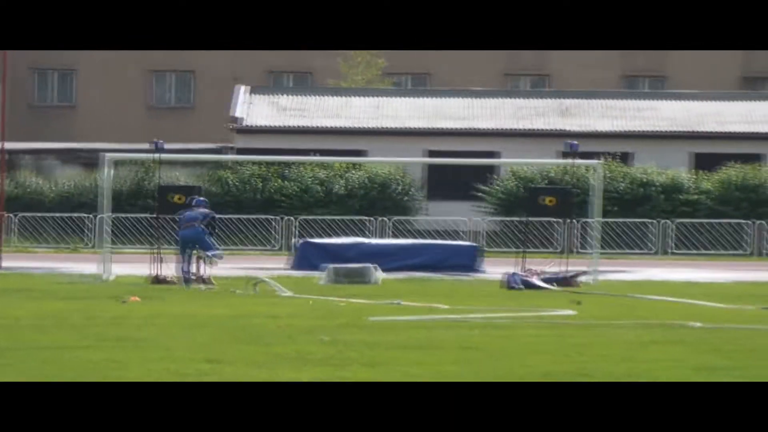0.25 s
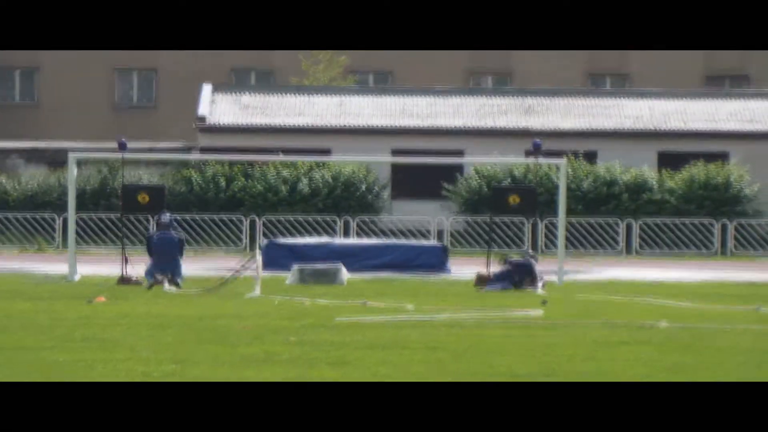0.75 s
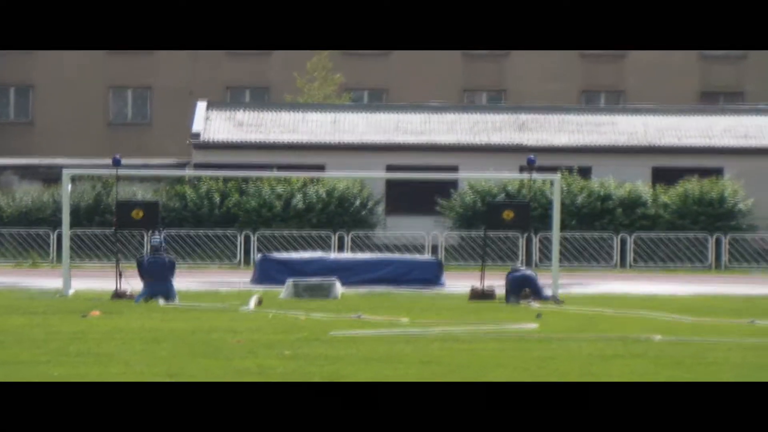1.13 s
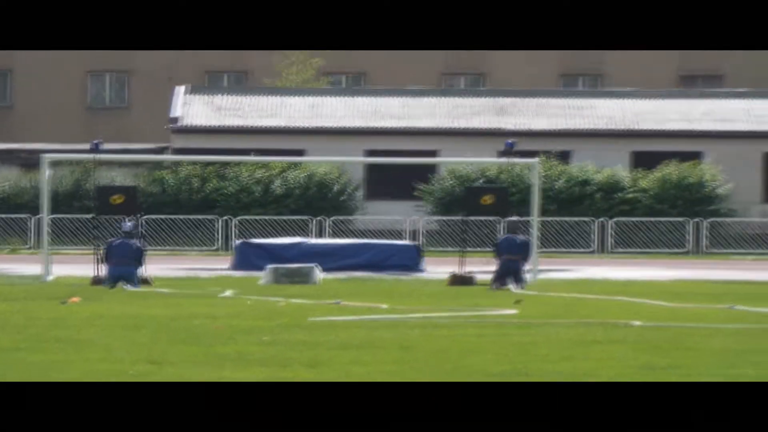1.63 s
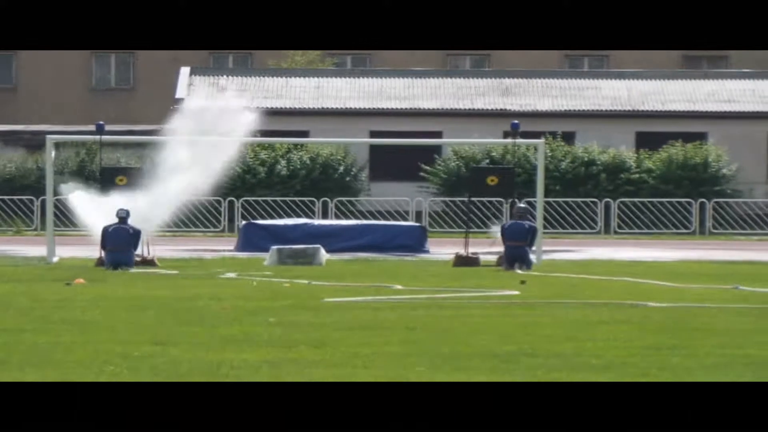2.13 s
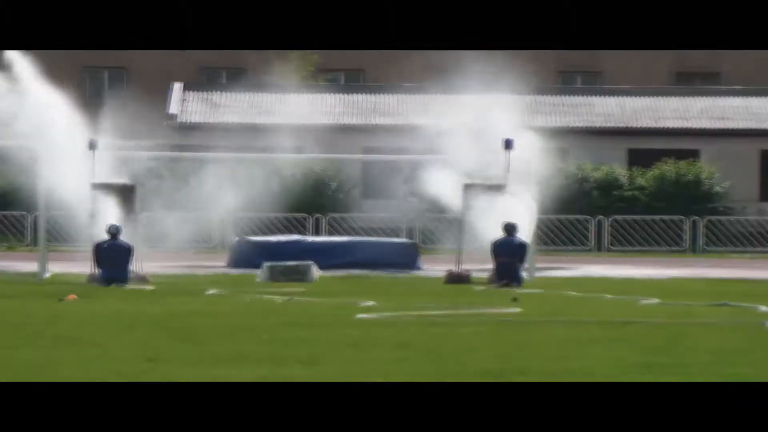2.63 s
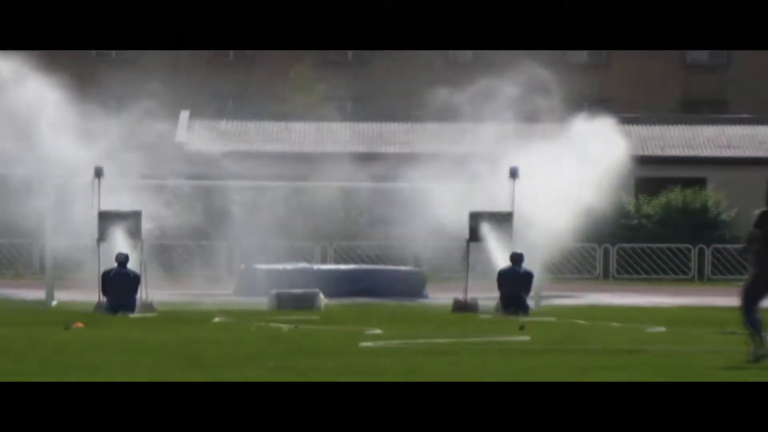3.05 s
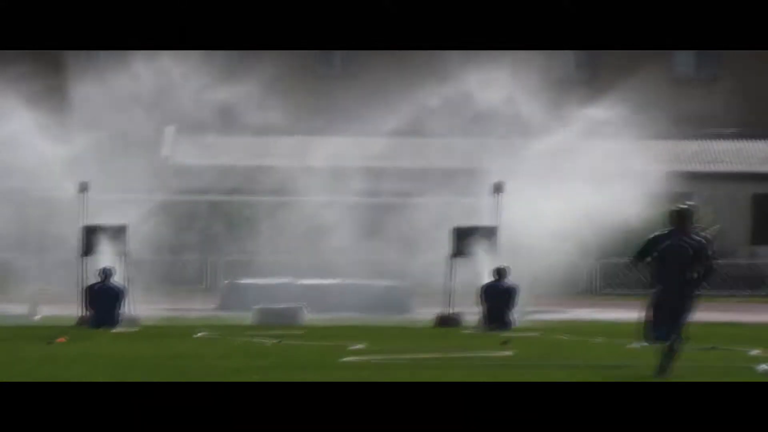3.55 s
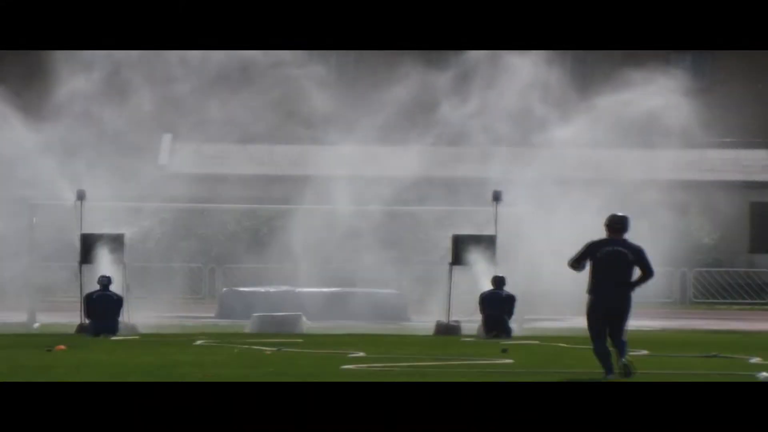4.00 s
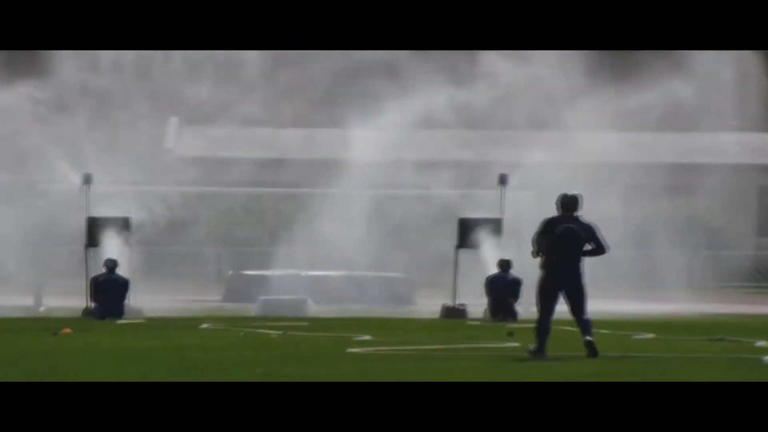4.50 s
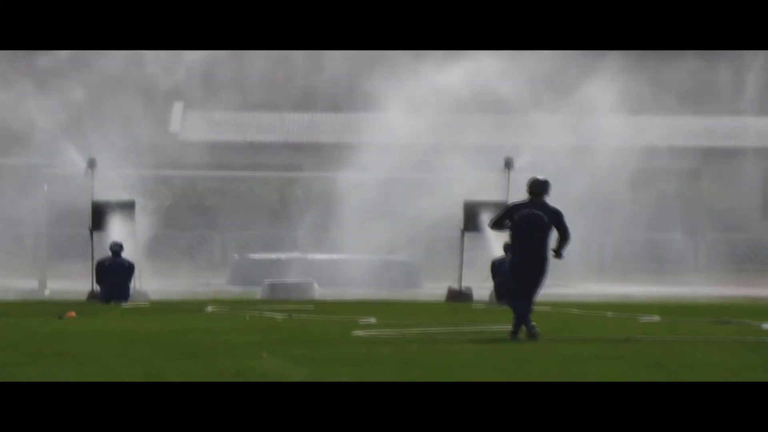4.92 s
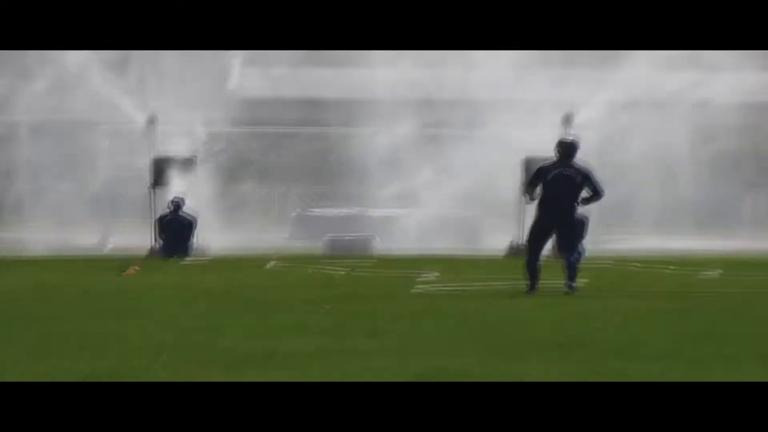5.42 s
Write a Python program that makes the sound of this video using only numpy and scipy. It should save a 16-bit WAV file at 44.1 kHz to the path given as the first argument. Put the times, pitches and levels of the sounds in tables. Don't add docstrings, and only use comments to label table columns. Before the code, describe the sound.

Close, raspy engine buzz holds steady, climbs in pitch after about two and a half seconds, then roars steadily over rushing water.

```python
import sys
import numpy as np
from scipy import signal
from scipy.fft import rfft, irfft, next_fast_len
from scipy.io import wavfile
from scipy.ndimage import uniform_filter1d, map_coordinates

SR = 44100
rng = np.random.default_rng(int(sys.argv[2]) if len(sys.argv) > 2 else 0)


def transcribe(u):
    v = np.clip(np.atleast_2d(u).T, -1, 1)
    q = np.round(v * 32767).astype(np.int16)
    wavfile.write(sys.argv[1], SR, q)


def elevation(decibels):
    levels = np.asarray(decibels, float)
    return 10 ** (levels / 20)


N = 249606
ECHO_S = .0016


def unit(x):
    return x / np.sqrt(np.mean(x ** 2) + 1e-20)


def along(points, hz):
    f, v = np.transpose(points)
    return np.interp(np.log(np.abs(hz) + 1), np.log(f + 1), v)


def curve(rows):
    s, value = np.transpose(rows)
    return np.interp(np.arange(N) / SR, s, value)


def wobble(rate):
    knots = rng.standard_normal(int(N * rate / SR) + 4)
    return map_coordinates(knots, [np.arange(N) * rate / SR])


def filtered(x, response):
    m = 2 * next_fast_len(N // 2 + SR // 4)
    return irfft(rfft(x, m) * response(np.fft.rfftfreq(m, 1 / SR)), m)[..., :N]


def resonance(f, centre, width, db):
    return elevation(db) * 1j * f * width / (centre ** 2 - f ** 2 + 1j * f * width)


def pulses(at, sizes):
    index = np.floor(at).astype(int)[:, None] + np.arange(-7, 9)
    off = index - at[:, None]
    taps = sizes[:, None] * np.sinc(off) * np.cos(np.pi * off / 16) ** 2
    return np.bincount(np.clip(index, 0, N - 1).ravel(), taps.ravel(), N)


def patchy(spectrum, patchy_db, channels):
    z = signal.stft(rng.standard_normal((channels, N)), nperseg=512)[2]
    field = uniform_filter1d(rng.standard_normal(z.shape[1:]), size=6, axis=0)
    field = uniform_filter1d(field, size=12, axis=1)
    noise = signal.istft(z * elevation(patchy_db * unit(field)), nperseg=512)[1][:, :N]
    return unit(filtered(noise, lambda hz: elevation(along(spectrum, hz))))


def hold(t, start, length, fade_s):
    return (np.tanh((t - start) / fade_s) - np.tanh((t - start - length) / fade_s)) / 2


# (time [s], level over the held load [dB])
LOAD = [(0, .5), (1.4, 0), (2.45, 1), (2.65, 1), (2.8, 1.5), (3.1, 4), (3.3, 4.5), (3.5, 7), (3.8, 5.5),
        (4.3, 5), (5, 6.5), (5.66, 6.5)]


def layer_db(held_db, db_per_db):
    return held_db + db_per_db * curve(LOAD)


# (time [s], firing rate [Hz])
SPEED = [(0.12, 125.87), (0.45, 125.61), (0.75, 125.25), (1.4, 125.43), (1.9, 126.24), (2.4, 126.79),
         (2.65, 128.32), (2.95, 132.67), (3.2, 137.79), (3.5, 144.54), (3.75, 148.8), (3.95, 150.89),
         (4.15, 151.83), (4.42, 152.33), (4.62, 152.72), (5.0, 153.34), (5.55, 153.84)]
# (size [dB], bark share at low speed [1], bark share at high speed [1])
CYLINDERS = [(6, 0.07, 0.13), (7.15, 1.0, 0.3), (2, 0.09, 0.13), (6, .78, 0.28)]


def engine():
    hz = curve(SPEED)
    turns = np.cumsum(hz * (1 + 0.00056 * wobble(25.09))) / SR
    fast = np.clip((hz - 128) / 22, 0, 1)
    number = np.arange(1, int(turns[-1]))
    at = np.interp(number, turns, np.arange(N))
    late_at = at + 1.1e-5 * SR * rng.standard_normal(len(number))
    share = np.interp(at, np.arange(N), fast)
    size_db, bark_slow, bark_fast = np.array(CYLINDERS)[number % 4].T
    edge_db = layer_db(-20.5, 1.19)

    edge = pulse_edges(late_at, number, share, fast, edge_db)
    bark = manifold_bark(late_at, (1 - share) * bark_slow + share * bark_fast, fast, edge_db)
    sharp = filtered(np.array([edge, bark]), lambda f: scatter(f, spread_s=.006, from_hz=2700))
    exhaust = band_swells(filtered(hum(hz, turns) + sharp[0], nulls) + sharp[1]
                      + uneven_firings(at, size_db, hz, fast)
                      + cover(gas_noise(turns) + clatter(turns), fast))
    return exhaust + glints(gas_puff(turns)), gas_puff(turns)


def echo(hz):
    return 1 - .85 * np.exp(-2j * np.pi * hz * ECHO_S)


# (frequency [Hz], level [dB])
HUM = [(125, -28), (155, -27.5), (250, -18.5), (260, -17.5), (305, -18.5), (380, -24), (560, -24),
       (600, -39.5)]


def order_db(k, hz):
    return layer_db(0.051, 0.97) + along(HUM, k * hz)


def hum(hz, turns):
    total = np.zeros(N)
    for k in range(1, 5):
        level = np.sqrt(2) * elevation(order_db(k, hz) + 0.025 * wobble(32))
        total += level * np.cos(2 * np.pi * k * turns + np.angle(echo(k * hz)))
    return total


def causal(pipe, f):
    return elevation(along(pipe, f)) * np.exp(1j * np.angle(echo(f) / (1 + 1j * f / 2500)))


# (frequency [Hz], level [dB])
PIPE_SLOW = [(350, -11), (600, 2), (764, 2), (815, -0.5), (1020, 2), (1210, -8), (1460, -14), (1750, -16),
             (1900, -7), (2040, -22), (2520, -11), (2900, -26), (3250, -17), (3600, -27), (5500, -36),
             (7150, -40), (12100, -120)]
PIPE_FAST = [(410, -41), (700, 5.5), (838, 10), (959, 7), (1240, 2.5), (1390, -1.5), (1700, 1.5),
             (2040, -8.5), (2600, -2), (3100, -4), (3560, -6), (4450, -19.5), (4950, -4), (5250, -20),
             (5900, -18), (9000, -120)]


def pulse_edges(at, number, share, fast, edge_db):
    swing_db = np.interp(share, [0, 1], (.4, 1.7)) * (2 * (number % 2) - 1)
    edges = pulses(at, elevation(swing_db + .4 * rng.standard_normal(len(at))))
    slow_edge = unit(filtered(edges, lambda f: causal(PIPE_SLOW, f)))
    fast_edge = unit(filtered(edges, lambda f: causal(PIPE_FAST, f)))
    return elevation(edge_db - 2.0) * ((1 - fast) * slow_edge + fast * fast_edge)


# (frequency [Hz], width [Hz], level [dB])
BARK = [(1060, 22, -1.5), (1307, 37, 0), (1457, 170, -0.5), (1746, 76, -7), (1945, 75, -23),
        (2260, 92, -13), (2780, 100, -10), (2800, 55, -11.5)]


def manifold_bark(at, branch_share, fast, edge_db):
    knocks = pulses(at, branch_share * elevation(.6 * rng.standard_normal(len(at))))

    def response(f):
        ring = sum(resonance(f, *mode) for mode in BARK) / (1 + 1j * f / 4000) ** 2
        returned = 1 - .4 * np.exp(-2j * np.pi * f * ECHO_S)
        return ring * returned * (1j * f / (800 + 1j * f))

    return elevation(edge_db - 6.5 - 9.6 * fast) * unit(filtered(knocks, response))


# (frequency [Hz], level [dB])
UNEVEN = [(20, -60), (80, -38), (105, -18), (200, -4), (240, -6), (310, 3), (400, -1), (480, -7), (570, 0),
          (650, -6), (900, -24), (1500, -120)]


def uneven_firings(at, size_db, hz, fast):
    sizes = elevation(size_db + 0.21 * rng.standard_normal(len(at)))
    excess = pulses(at, sizes - np.mean(elevation(size_db)))
    return elevation(order_db(2, hz) - 20.0 - fast) * unit(filtered(excess, lambda f: elevation(along(UNEVEN, f))))


def gas_puff(turns):
    weaker_db = -2.5 * (1 - turns // 1 % 2)
    return unit(1.5 + np.exp(-3.5 * (turns % 1)) * elevation(weaker_db))


# (frequency [Hz], level [dB])
GAS = [(40, -32), (120, -4.5), (300, -3), (800, -5.5), (1200, -7.5), (1500, -8), (2000, -7), (2380, -9.5),
       (2540, -11), (2750, -14.5), (3700, -11.5), (4050, -9), (4550, -13.5), (5150, -11), (5800, -15),
       (16000, -32)]


def gas_noise(turns):
    return elevation(layer_db(-30.8, .55)) * gas_puff(turns) * patchy(GAS, patchy_db=.9, channels=1)[0]


def clatter(turns):
    contacts = 26
    place, size = 4 * rng.random(contacts), rng.standard_normal(contacts)
    when = (np.arange(0, turns[-1] - 4, 4)[:, None] + place).ravel()
    sizes = np.resize(size, len(when)) * elevation(.8 * rng.standard_normal(len(when)))
    taps = pulses(np.interp(when, turns, np.arange(N)), sizes)
    return elevation(layer_db(-29.5, .1)) * unit(filtered(taps, lambda f: elevation(along(GAS, f))))


# (low-speed frequency [Hz], high-speed frequency [Hz], width [Hz],
# level over the excitation at low speed [dB], at high speed [dB])
COVER = [(2506, 2620, 210, 5.5, 6), (2160, 2350, 55, 3, -6), (1636, 1620, 220, 2, -8),
         (3250, 4500, 49, 7, -8)]


def cover(x, fast):
    low = filtered(x, lambda f: sum(resonance(f, a, w, db) for a, b, w, db, _ in COVER))
    high = filtered(x, lambda f: sum(resonance(f, b, w, db) for a, b, w, _, db in COVER))
    return x + (1 - fast) * low + fast * high


def scatter(f, spread_s, from_hz):
    knots = rng.random(200)
    delay = spread_s * np.interp(f / 140, np.arange(len(knots)), knots)
    delay = delay / (1 + (from_hz / (f + 1)) ** 14)
    return np.exp(-2j * np.pi * np.cumsum(delay) * f[1])


# (frequency [Hz], width [Hz], depth [dB])
NULLS = [(450.8, 18.5, -10.5), (513.5, 27, -9.5), (572, 13, -3.5), (619.7, 24, -10), (741.5, 32, -19),
         (800, 39, -18), (854, 41, -4), (901.5, 17, -5), (948, 32.5, -18.5), (1101, 48, -8.5),
         (1192, 137, -11.5), (1260, 14, -10), (1620, 16.5, -35), (1830, 27, -21), (2060, 34, -36),
         (2775, 126, -21)]


def nulls(f):
    dips = [(c * c - f * f + 1j * f * w * elevation(db)) / (c * c - f * f + 1j * f * w) for c, w, db in NULLS]
    return np.prod(dips, axis=0)


# (start [s], length [s], frequency [Hz], gain [dB])
BAND_SWELLS = [(0, 0.49, 1660, 7), (0, 0.64, 1005, -2), (0, 2.2, 956, -6), (0, 1.3, 1370, -3),
               (0, 1.7, 1137, 4.5), (0, 2.9, 2787, -7), (.3, 2.7, 2020, -15), (.35, 1.4, 3420, 8),
               (.6, 2.6, 2522, 5.5), (.65, 0.81, 627, -2), (.65, 1.1, 1230, -6), (0, 2.4, 2380, -5),
               (1.5, 1.1, 3280, 3.5), (1.6, 1.12, 1560, -7), (1.6, 0.88, 1630, 0), (0, 1.6, 2140, 3.5),
               (1.9, 0.73, 1140, -2), (1.9, 0.72, 1290, -13), (2.15, 0.36, 885, -6), (2.3, .6, 770, -7),
               (2.4, 0.65, 474, 3), (3.05, 0.46, 980, -3), (0, 3.1, 1810, 0), (3.6, 2.3, 2720, -2),
               (3.65, 0.19, 1945, 10), (3.65, 1, 2277, 7), (4.2, 0.75, 1696, 2.5), (4.25, 0.36, 914, 1.5),
               (4.25, 0.22, 1066, 5), (4.25, 0.5, 3530, -10), (4.25, 1.4, 3040, -19), (4.3, 1.4, 1310, 3.5),
               (4.3, 1.6, 1605, 0), (4.55, 1.2, 2176, -7), (0, 2.7, 702, 2.5), (4.8, .9, 596, -3.5),
               (4.85, 0.35, 1073, -7), (4.85, .9, 1995, -6), (4.85, .9, 4145, 2), (5.05, 0.48, 1240, -13),
               (5, 0.9, 3530, 3.5), (5.15, 0.48, 1690, -3), (0, 2.5, 2037, 8), (1.6, 0.88, 1880, -1),
               (0, 2.9, 3090, 7), (.6, 2.6, 2920, -6), (4.2, 1.4, 4435, 9), (4, 1.7, 4745, -6),
               (4.3, 1.3, 4100, -8), (3.6, 0.99, 3910, 7)]


def band_swells(x):
    hz, t, z = signal.stft(x, SR, nperseg=2048, noverlap=1536)
    start, length, centre, db = np.transpose(BAND_SWELLS)[:, :, None]
    band = np.exp(-.5 * ((hz - centre) / 26) ** 2)
    gain_db = band.T @ (db * hold(t, start, length, fade_s=.08))
    return signal.istft(z * elevation(gain_db), SR, nperseg=2048, noverlap=1536)[1][:N]


def rough_bands(puff, rows, width_hz, fade_s):
    t = np.arange(N) / SR
    band, waver = filtered(rng.standard_normal((2, N)), lambda f: 1 / (1 + (f / width_hz) ** 4))
    drift = 2 * np.pi * np.cumsum(.6 * width_hz * unit(waver)) / SR
    body = unit(1 + .5 * unit(band))
    tones = sum(elevation(db) * hold(t, start, length, fade_s) * np.sin(2 * np.pi * hz * t + drift)
                for start, length, hz, db in rows)
    return np.sqrt(2) * np.sqrt(puff) * body * tones


# (start [s], length [s], frequency [Hz], level [dB])
GLINT = [
    (0.037, 0.39, 3410, -33.5),
    (0.39, 0.11, 3470, -32),
    (0.52, 0.45, 4800, -40),
    (6.1, 0.33, 5000, -41),
    (3.26, 0.21, 6000, -39),
]


def glints(puff):
    return rough_bands(puff, GLINT, width_hz=112, fade_s=.03)


# (frequency [Hz], level [dB])
RUSH = [(100, -40), (400, -14), (2000, -10), (4500, -8), (6500, -1), (8000, 0), (9200, -2), (10500, -4),
        (12200, -4), (13700, -8), (15000, -14), (17000, -22)]


def water():
    ground_s = .00073
    level = elevation(layer_db(-45, 1.25) + 10.0 + 1.65 * wobble(4.3))
    near = patchy(RUSH, patchy_db=1.5, channels=1)[0]
    near = filtered(near, lambda f: 1 + .4 * np.exp(-2j * np.pi * f * ground_s))
    spread = elevation(-7) * patchy(RUSH, patchy_db=1.2, channels=2)
    return level * near, level * spread


# (start [s], length [s], frequency [Hz], level [dB])
SPRAY = [
    (3.9, .7, 8650, -46),
    (5.05, .16, 8650, -46.5),
    (5.56, .2, 7650, -44),
]


def spray(puff):
    return rough_bands(puff, SPRAY, width_hz=350, fade_s=.06)


# (frequency [Hz], level difference [dB])
RIGHT_DB = [(100, -.3), (170, -.3), (250, -.8), (380, -.9), (700, -.5), (1290, .5), (2380, -1.5),
            (4400, -.3), (5200, -1.5), (5700, 3), (6200, 0), (6800, .5), (7200, 4), (7700, 0), (11000, 0),
            (11800, 2.5), (12700, 0), (13400, 1.5), (14200, -1)]
# (frequency [Hz], phase [rad])
TRAIL = [(100, .02), (250, .05), (500, .17), (1000, .42), (2000, .6), (2700, .85), (3300, 1.25),
         (4100, 1.7), (4950, 2.0), (5350, 2.45), (5800, 2.2), (6500, 2.5), (8000, 2.9), (9300, 3.14),
         (11000, 3.5), (12300, 3.9), (15000, 5.2)]


def two_ports(direct):
    side = np.array([[-.5], [.5]])
    return filtered(direct, lambda f: elevation(side * along(RIGHT_DB, f)) * np.exp(1j * side * along(TRAIL, f)))


# (frequency [Hz], decay time t60 [s])
FIELD = [(200, 0.4), (2000, 0.14), (10000, 0.021)]


def field(x):
    hz, t, z = signal.stft(rng.standard_normal((2, SR // 2)), SR, nperseg=256)
    tail = signal.istft(z * elevation(-60 * t / along(FIELD, hz)[:, None]), SR, nperseg=256)[1]
    tail = tail / np.linalg.norm(tail[0])
    thin = filtered(x, lambda f: f ** 2 / (f ** 2 + 600 ** 2) / (1 + (f / 6000) ** 4))
    delayed = np.pad(thin, (1500, 0))
    return signal.fftconvolve(delayed[None], tail, axes=1)[:, :N]


# (frequency [Hz], level [dB])
RUMBLE = [(20, 5), (50, 6), (100, 5), (200, 1), (400, -35), (800, -120)]


def rumble():
    a, b = patchy(RUMBLE, patchy_db=2.5, channels=2)
    return elevation(-50) * np.array([a + 0.37 * b, a - 0.29 * b])


def scene():
    motor, puff = engine()
    near, spread = water()
    direct = motor + near * unit(puff ** 2.0)
    walls = elevation(-17) * field(direct)
    return two_ports(direct) + spread + walls + rumble() + spray(puff)


def low_pass(x):
    return signal.sosfilt(signal.butter(12, 15810, fs=SR, output="sos"), x)


def record(dry):
    held = dry / (1 + np.abs(dry / .98) ** 10) ** (1 / 10)
    held = filtered(held, lambda f: f ** 2 / (f ** 2 + 22 ** 2))
    return low_pass(held)


dry = scene()
out = record(dry)
transcribe(out)
```